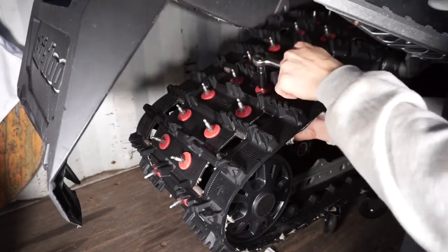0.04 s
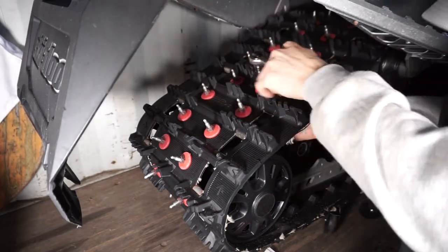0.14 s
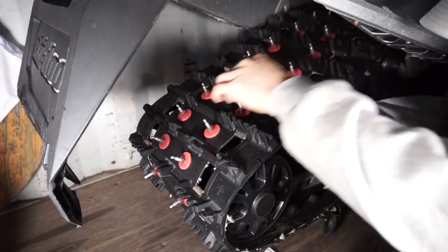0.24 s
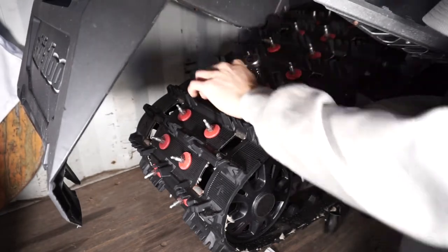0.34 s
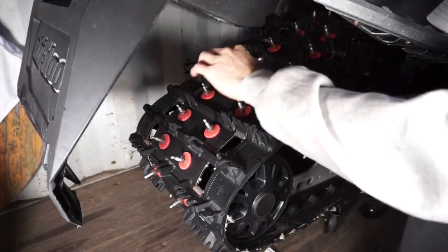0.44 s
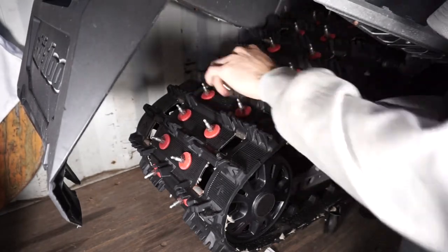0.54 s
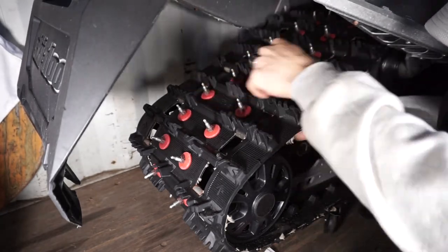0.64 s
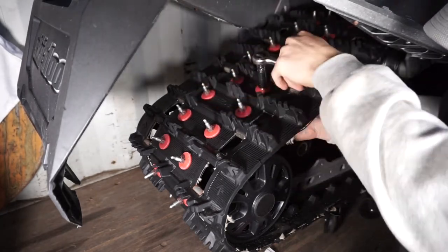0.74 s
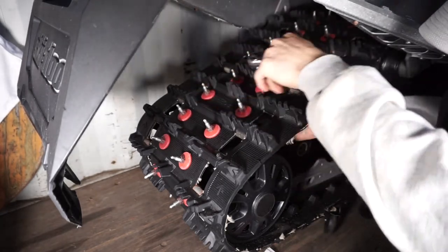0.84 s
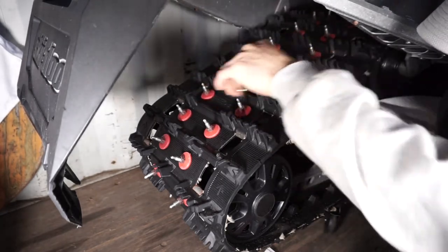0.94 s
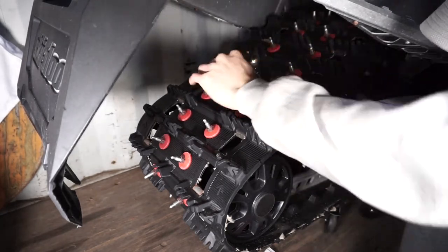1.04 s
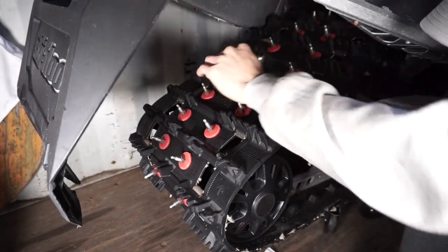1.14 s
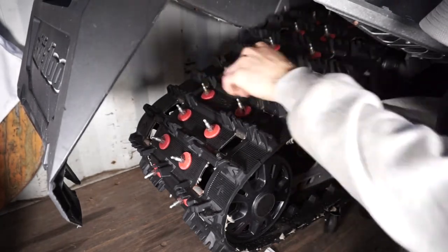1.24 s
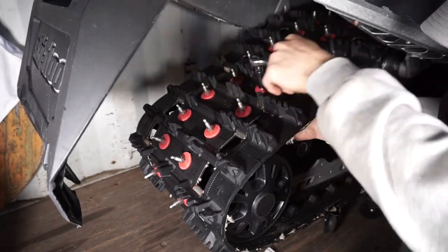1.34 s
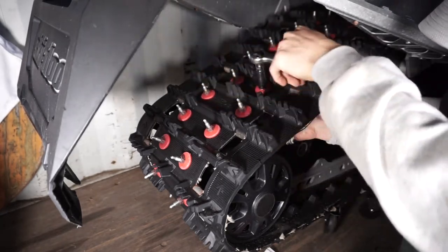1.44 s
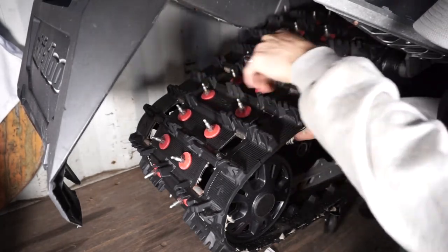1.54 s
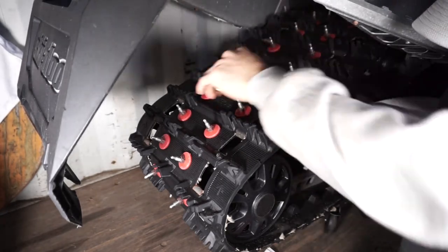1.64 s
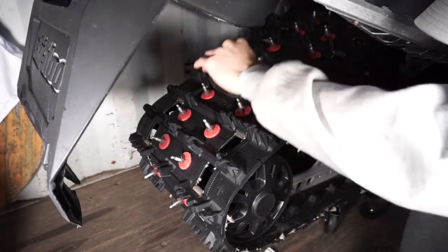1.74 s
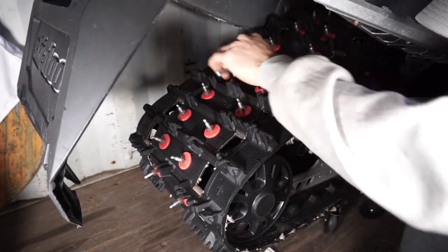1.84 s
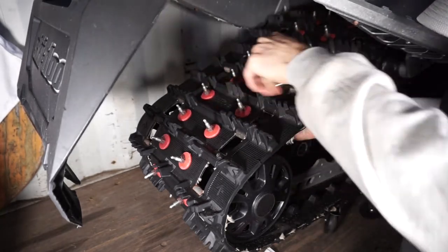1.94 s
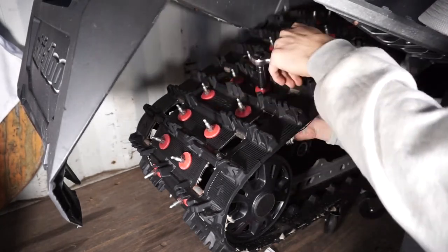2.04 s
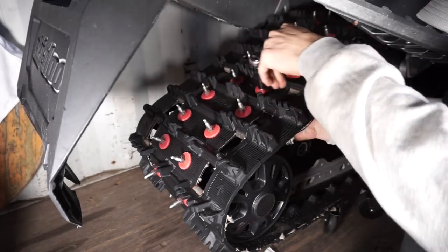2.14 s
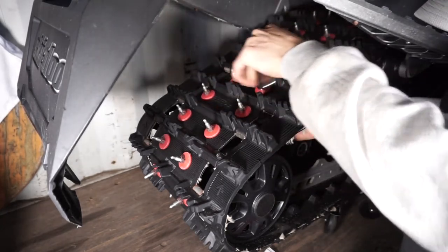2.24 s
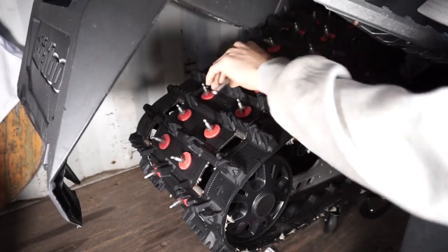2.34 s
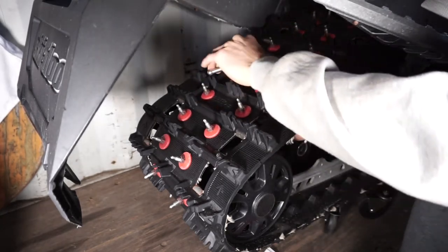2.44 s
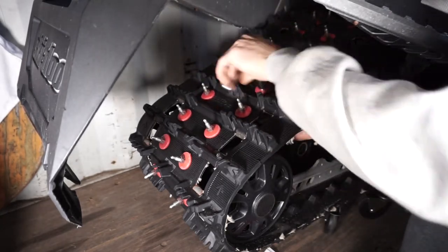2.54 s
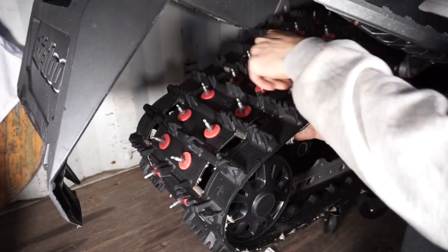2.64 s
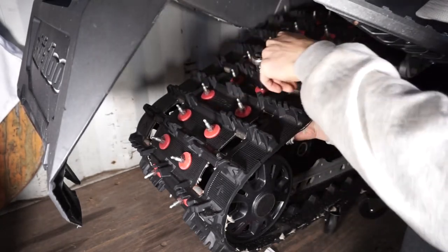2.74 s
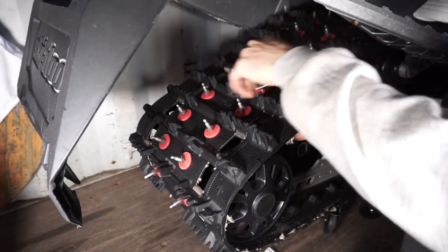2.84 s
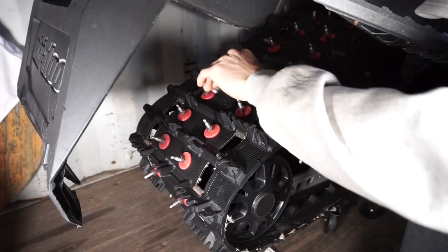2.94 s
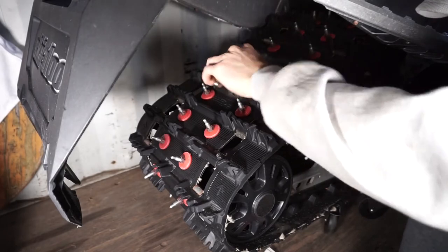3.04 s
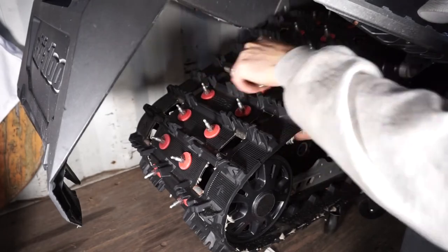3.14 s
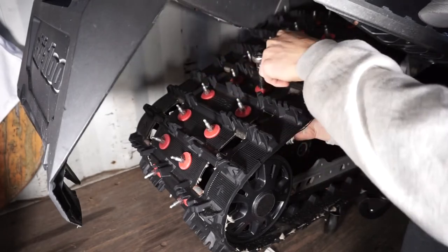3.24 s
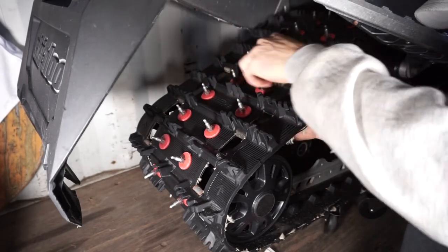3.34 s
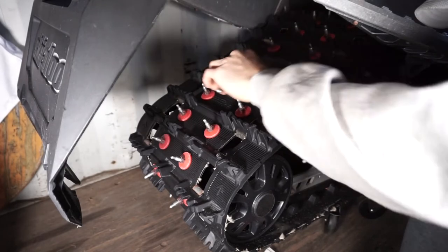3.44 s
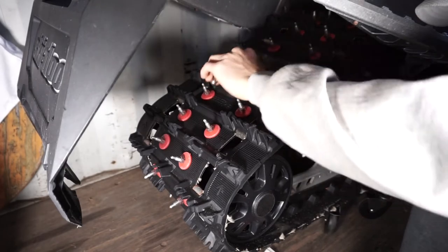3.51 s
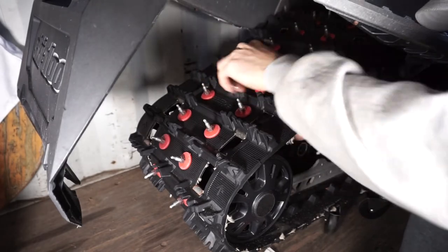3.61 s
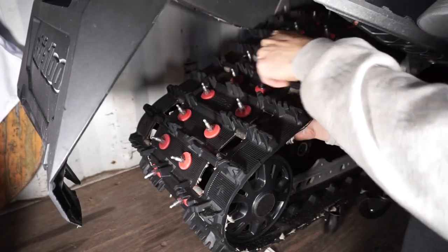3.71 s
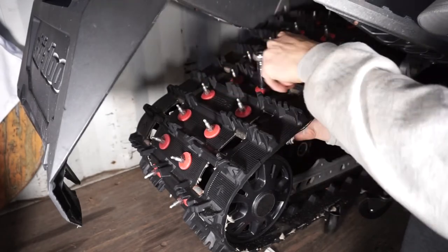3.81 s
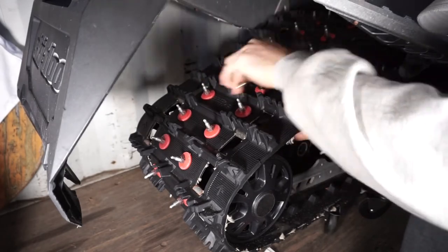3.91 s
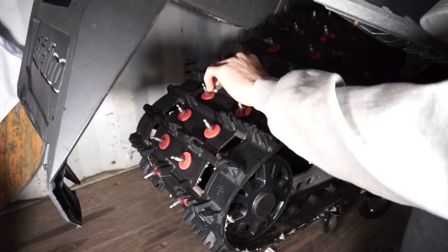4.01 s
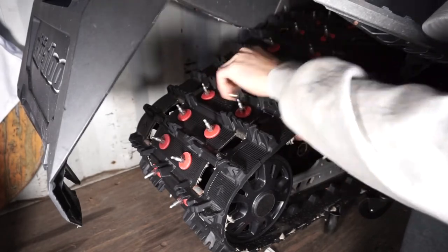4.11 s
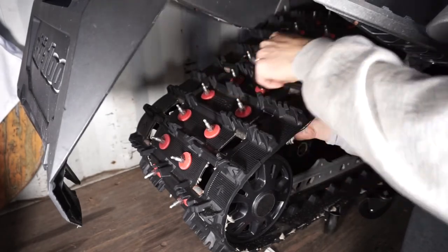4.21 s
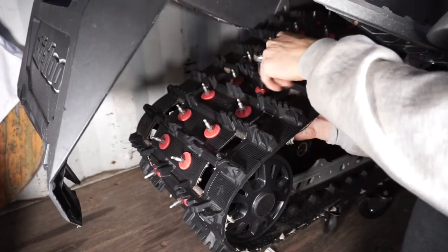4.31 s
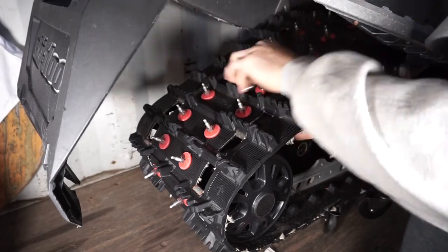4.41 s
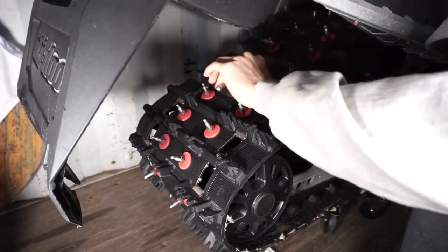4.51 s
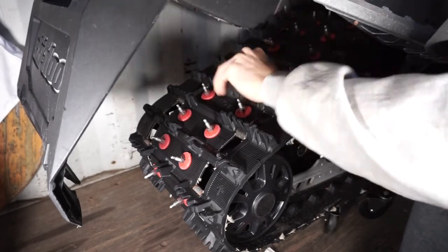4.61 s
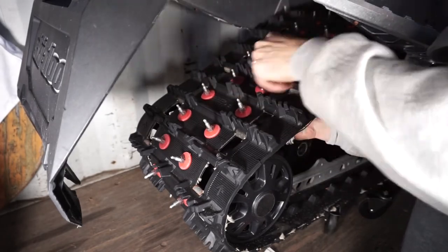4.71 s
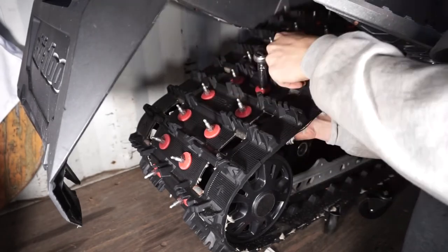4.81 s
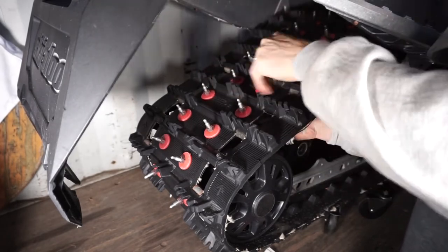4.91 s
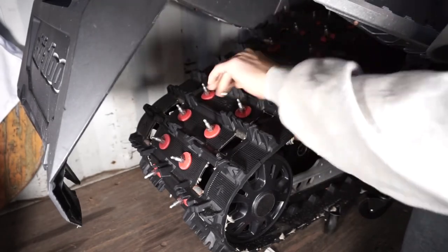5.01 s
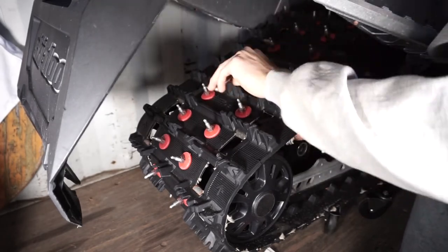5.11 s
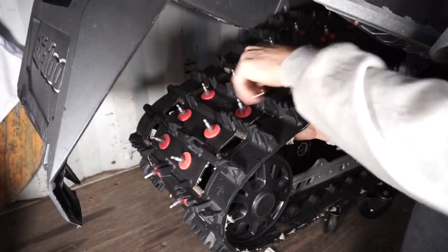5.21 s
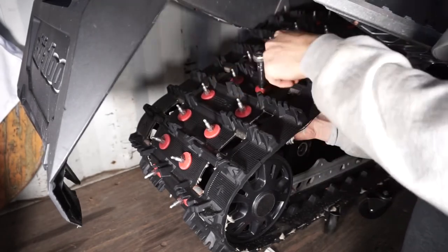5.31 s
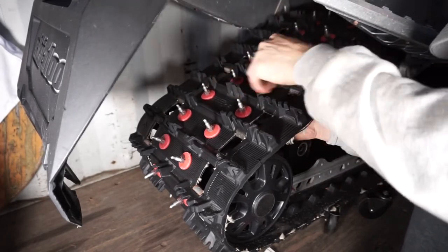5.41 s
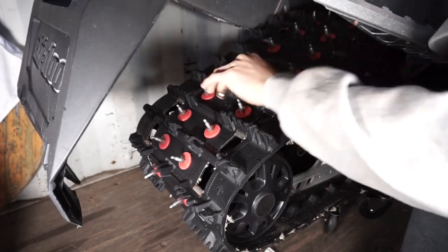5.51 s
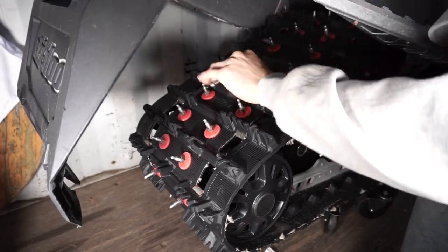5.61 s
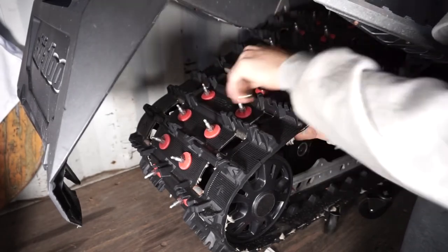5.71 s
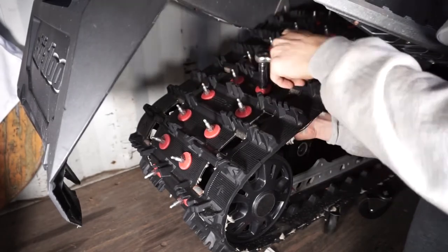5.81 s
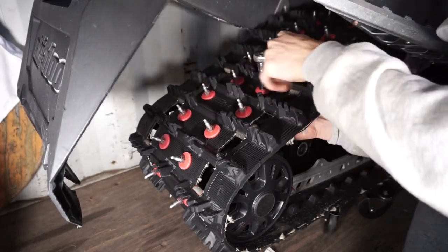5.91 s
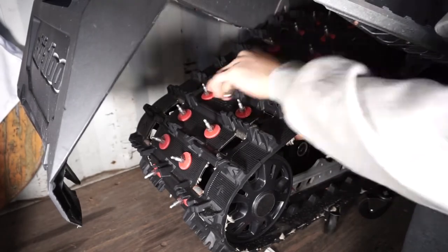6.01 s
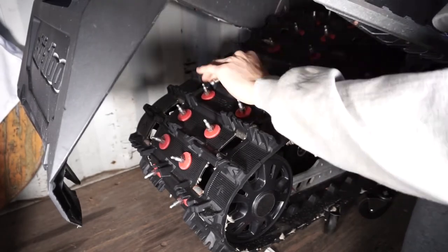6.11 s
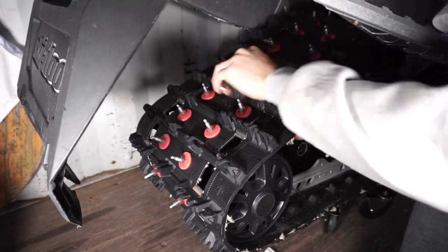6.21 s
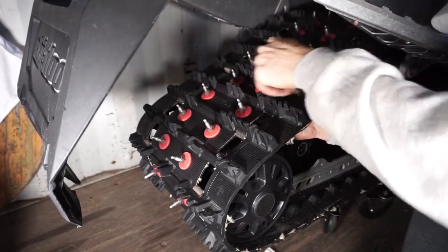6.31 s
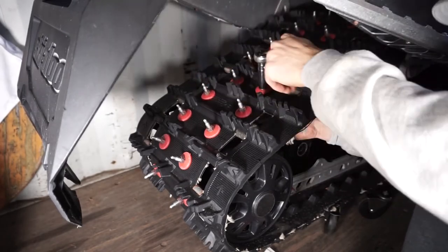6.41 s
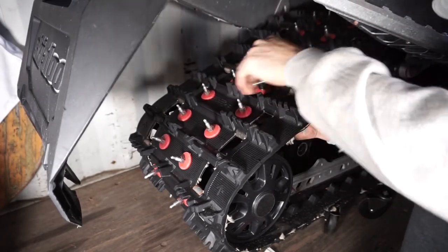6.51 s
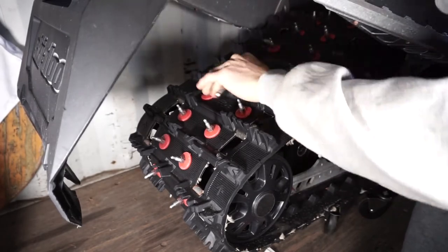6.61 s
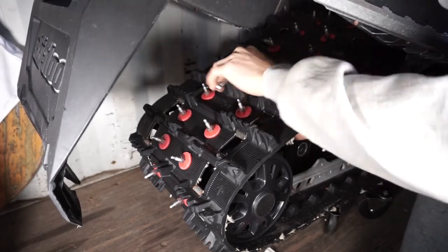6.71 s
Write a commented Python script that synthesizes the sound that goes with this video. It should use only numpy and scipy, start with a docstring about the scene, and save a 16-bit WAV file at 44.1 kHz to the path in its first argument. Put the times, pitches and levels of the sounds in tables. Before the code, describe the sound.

A small ratchet wrench tightens a nut on a stud in a rubber track, close to the microphone. Each back stroke gives a quick burst of bright, ringing clicks, repeating about twice a second. Between bursts the socket taps, scrapes and squeaks briefly a few times, while the track gives soft creaks and hollow knocks. A faint hum and hiss fill the workshop.

```python
"""Quick, bright metal clicks, close by: a small ratchet wrench tightens a nut on a stud in a
rubber track. On each back stroke the pawl (a little spring-loaded catch) snaps over the teeth
and makes the steel ring. On the pull the socket taps, rubs and squeals, while the track
creaks and gives hollow knocks. Under it all lie a mains hum, a low room rumble and faint hiss."""
import sys
import numpy as np
from scipy import signal
from scipy.io import wavfile
from scipy.ndimage import uniform_filter1d

SR = 44100
rng = np.random.default_rng(int(sys.argv[2]) if len(sys.argv) > 2 else 0)


def dump_mix(stems):
    """Bounce the given channels to the path in sys.argv[1] as a 16-bit WAV at rate SR."""
    frames = np.atleast_2d(stems).T  # one column per channel
    limited = np.clip(frames, -1, 1)  # hard clip at full scale
    pcm = np.round(limited * 32767).astype(np.int16)
    wavfile.write(sys.argv[1], SR, pcm)


N = 297675

# Levels compare the rows of a table; the functions set the final loudness.
# Back strokes: t/s, length/s, handle ring/dB, spring ring/dB, track rumble/dB, rubber creak/dB, grip
# (ring levels are added to the blow's level; a bigger grip makes the ringing die sooner)
BACK_STROKES = [(0, 0.033, -0.5, -11, -39.5, -36.5, 0.98), (0.546, 0.17, 2.5, -10.5, -47, -49, 0.74),
                (1.202, .24, 5, -4, -49, -43.5, 0.68), (1.861, 0.19, 4.5, -9, -46.5, -45, 0.77),
                (2.544, 0.45, 3, -7, -50, -47, 0.78), (3.09, 0.21, 4.5, -8, -48, -43, 0.9),
                (3.637, 0.17, 3.5, -5, -45.5, -43, 0.85), (4.143, 0.23, 4, -13, -44.5, -47, 1.15),
                (4.667, 0.12, 3, -7.5, -42.5, -41.5, 1.22), (5.199, 0.17, 2, -8.5, -40.5, -39, 0.77),
                (5.77, 0.12, 4, -6, -37.5, -38.5, 1.07), (6.245, 0.41, 3.5, -10, -51, -49, 1.01)]
# The pawl drops over a tooth: t/s, blow/dB, socket ring/dB, pawl ring/dB
TOOTH_SNAPS = [(.0084, -24, -8, 2), (.0272, -28, 4, 2), (.0467, -25, 13.5, -14), (0.0678, -25, 12.5, 2),
               (0.1229, -24.5, -14, 5), (0.5805, -23, 8.5, -13), (0.5929, -23, 14, -9),
               (0.6011, -24, 8, -6), (0.6087, -31, -6, -8), (0.6228, -29.5, -8, -2), (0.635, -26.5, 0, -4),
               (0.648, -33, 0, 6), (0.6607, -28, -3, -3), (0.6713, -27, -1, -2), (0.6845, -20.5, 13.5, 12),
               (.7038, -24.5, 1, -4), (0.713, -23, 2, -10), (.726, -16, -6, 6.5), (0.7524, -20.5, 0, 7),
               (0.7801, -24.5, 5, 13), (1.2421, -31.5, 3, 19), (1.258, -32.5, 9, 14),
               (1.2724, -29.5, 14.5, 9), (1.2882, -28, 8, 13), (1.298, -30, 19, 14), (1.3126, -28, 18, 4),
               (1.325, -30, 3, -3), (1.3367, -30, 6, -2), (1.3482, -22.5, 11, 2), (1.375, -24, 4, 11.5),
               (1.405, -30, 6, 18.5), (1.4386, -31.5, 4, 14), (1.5119, -40.5, 8, 14.5),
               (1.8782, -36, 11, -4), (1.9016, -23, 4, 16.5), (1.915, -27.5, 18.5, 15),
               (1.9274, -22.5, 12, 12.5), (1.9383, -23, 2, 0), (1.9494, -18, 5.5, -3), (1.9641, -16, 7, -1),
               (1.9837, -22.5, 10.5, 6), (1.9898, -24, 3, 2), (2.0017, -24.5, 9, -3), (2.0144, -21.5, 5, 7),
               (2.023, -28.5, 17.5, -3), (2.038, -23, -4, 7), (2.0507, -24, -2, 7), (2.068, -29, 13, -1),
               (2.5847, -22, 11.5, -5), (2.5988, -28, 12, -2), (2.608, -26.5, 11.5, -3),
               (2.6177, -23.5, -6, -3), (2.6272, -26, 7, 0), (2.6388, -26, 0, -4), (2.648, -27, 0, -5),
               (2.6591, -27, 8, -8), (2.6686, -31, 0, 5), (2.6771, -26, -1, 17), (2.687, -16, 9.5, -10),
               (2.6975, -20.5, -6, 6), (2.7157, -21, -11, 13), (3.1437, -26.5, -1, 12.5),
               (3.1575, -31, 7, 12), (3.17, -29, 0, 10), (3.1807, -30, 11, 5), (3.1917, -25.5, 9, 17),
               (3.205, -30, 12, 5), (3.2163, -29, -4, -7), (3.2246, -22, 6, -6), (3.2387, -23, 7.5, -11),
               (3.2545, -32.5, 5, 9), (3.2947, -28.5, 6, 8), (3.3286, -36, 3, -7), (3.6566, -21, -4, 7.5),
               (3.6686, -24.5, -6, 3), (3.6796, -22.5, 9, -5), (3.6897, -21.5, -3, 5), (3.7, -18, 0, 7),
               (3.712, -16, 4.5, 5.5), (3.7338, -19.5, 1, 1), (3.7927, -28, -16, 1), (3.808, -33.5, 6, -9),
               (4.1749, -17, 4.5, -12), (4.1882, -22.5, 12, -11), (4.196, -22, 4, -11.5),
               (4.2078, -19.5, 4, -12), (4.217, -23, 13, -13), (4.228, -26, 12, -6), (4.238, -25, 12, -6),
               (4.248, -27, 17, -3), (4.2595, -17, 2, -11), (4.2999, -22.5, 3, 6), (4.319, -34.5, 7, -14.5),
               (4.3398, -24, 3.5, -1), (4.699, -22.5, -2, -18), (4.711, -23.5, -3, -14),
               (4.7221, -28.5, 0, -4), (4.7329, -23.5, -7, -7), (4.742, -22.5, 8, -11),
               (4.7593, -24.5, 0, 2), (4.7661, -25.5, 5, 7.5), (4.775, -21, 13, 9.5),
               (4.783, -17.5, -5.5, -16), (4.827, -20.5, 8, 2), (4.8479, -26, 13.5, 11.5),
               (5.2296, -32.5, 1, 4), (5.242, -29.5, 3, 2), (5.2543, -23, -4, -5), (5.2665, -24.5, 6, -10),
               (5.2762, -23, -2, -11), (5.287, -22.5, 6, -14), (5.2957, -19.5, 5, 1),
               (5.3128, -22.5, 8, -3), (5.357, -27, 7.5, 11.5), (5.7422, -19, 4, -11),
               (5.755, -19.5, 3.5, 2), (5.767, -20, 7, -10), (5.7792, -18.5, 0, -14), (5.7885, -20, 7, -14),
               (5.797, -18, -2, -9), (5.8056, -16, 6.5, -6), (5.822, -19.5, -18, -14),
               (5.865, -29.5, -7, 1), (5.8828, -28.5, -6, -6), (5.892, -30, 11, 5), (6.2858, -19, 6.5, -11),
               (6.2971, -19, 10, -14), (6.309, -17, 6, -17), (6.3198, -18, 6, -12), (6.3284, -18, 9, -11),
               (6.3359, -27, 15, -8), (6.347, -24, 17, -11), (6.356, -27, 9, 5), (6.366, -22, 4, 13),
               (6.3756, -26.5, 9, 10), (6.3895, -21, 11.5, -12), (6.4054, -23, 8, 6.5),
               (6.4204, -21.5, 7.5, 4)]
# The slack in the socket and drive knocks shut: t/s, blow/dB, handle ring/dB
SLACK_TAPS = [(0.1673, -36, 14), (.2292, -48, 15), (0.5488, -39, 4), (0.5581, -24.5, 9), (1.219, -46, 8),
              (1.6713, -35, -21), (1.803, -49, -2), (1.869, -51, 24), (2.104, -47, 23.5), (2.2064, -49, 9),
              (2.224, -39, 7.5), (2.46, -55.5, -8), (2.5128, -48.5, 4), (2.5497, -39, 7),
              (2.5639, -26, 10.5), (2.7725, -25, 5.5), (2.8201, -40, -11), (2.8452, -32, -21),
              (2.9849, -38, 5.5), (3.0954, -45, 4), (3.127, -38, 10), (3.346, -39, -10), (3.456, -52, -17),
              (3.545, -54, -14), (3.629, -32, 4), (3.834, -44, 21.5), (3.8927, -52, 13), (3.9114, -49, -7),
              (3.9332, -39, 14), (3.9744, -47, -11), (4.116, -53, -10), (4.148, -43, 10), (4.15, -31, 20),
              (4.169, -33, 5), (4.645, -51, 10), (4.6725, -29, 10.5), (4.909, -38.5, -2),
              (4.9272, -36, -13), (4.9335, -40.5, -7), (5.0275, -49, -12), (5.0404, -38.5, -23),
              (5.107, -47.5, -6), (5.206, -45, -12), (5.376, -24, -17), (5.4284, -33, -13),
              (5.5188, -47, -9), (5.528, -32, -6), (5.707, -29.5, -1), (5.8496, -40, -4),
              (5.9181, -22.5, 8), (6.029, -34, 15), (6.0631, -28, -14), (6.124, -43.5, 2), (6.245, -55, 20),
              (6.2602, -25.5, 15), (6.6098, -44, -18), (6.618, -43.5, 13)]
# Socket and nut slip on the pull: t/s, length/s, level/dB, squeak f/Hz, squeak/dB added to the level
SOCKET_RUBS = [(0.175, 0.0088, -31, 3090, 1), (0.289, 0.027, -52, 2520, -2), (0.3, 0.011, -29, 1860, -27),
               (0.468, 0.016, -61, 2730, -9), (0.901, 0.028, -49.5, 3300, -5), (0.975, 0.013, -62, 6250, 5),
               (1.02, 0.022, -40, 3000, -5), (1.077, 0.04, -41.5, 3050, -24),
               (1.123, 0.032, -39.5, 1750, 2), (1.36, 0.0092, -36, 1470, -24),
               (1.46, 0.019, -48, 3040, -21), (1.514, 0.008, -45.5, 3980, 22),
               (1.553, 0.021, -35, 3500, -13), (2.249, 0.018, -45, 6080, 0),
               (2.916, 0.018, -58.5, 1520, -4), (2.939, 0.015, -42.5, 2560, 0.5),
               (3.367, 0.0081, -38.5, 2400, -19.5), (3.46, 0.061, -46, 2670, -12),
               (3.996, 0.019, -46, 6280, -14), (4.492, 0.024, -48.5, 2130, -7),
               (5.077, 0.014, -47, 6260, 8), (5.541, 0.018, -35.5, 2800, -1.5),
               (6.043, 0.053, -35, 2700, -11), (6.181, 0.0087, -64.5, 4700, 9.5),
               (6.471, 0.024, -47, 6480, 5), (6.517, 0.015, -47.5, 1320, 12),
               (6.629, 0.028, -35, 2700, -42)]
# Short squeals inside the longer rubs: t/s, length/s, level/dB, start f/Hz, middle f/Hz, end f/Hz
SOCKET_SQUEALS = [(3.462, .034, -36, 2500, 3500, 1500), (6.05, .04, -28.5, 2050, 2500, 1400),
                  (6.626, .016, -28, 2800, 2700, 1450)]
# Hollow knocks of the track: t/s, level/dB, f/Hz
TRACK_KNOCKS = [(0.124, -35.5, 218), (0.175, -30, 227), (0.284, -38.5, 200), (0.554, -36, 214),
                (0.902, -41, 233), (1.215, -36, 407), (1.512, -44, 150), (1.555, -33.5, 690),
                (1.67, -37.5, 236), (2.219, -39, 250), (2.56, -36, 221), (2.69, -37, 301),
                (2.988, -31.5, 219), (3.212, -36.5, 208), (3.453, -38.5, 205), (3.629, -48, 413),
                (3.966, -31, 219), (4.147, -50, 166), (4.185, -31, 538), (4.476, -37.5, 228),
                (4.669, -30.5, 153), (5.199, -35.5, 615), (5.706, -32.5, 259), (6.289, -41, 574),
                (6.421, -32, 225)]

# The tones each steel part rings with: f/Hz, level/dB, fade/s (time to fall 60 dB at a grip of 1)
HEAD_TONES = [(2540, -5, 0.028), (3066, 2, 0.039), (5030, -26.5, .015), (6250, 9.5, 0.021),
              (6410, 2, 0.022), (7400, -6.5, 0.022), (7700, 12, 0.0071), (8570, -8, 0.034), (8100, 5, 0.04)]
HANDLE_TONES = [(3370, -10, .025), (3650, -10, .02), (3900, 0, .04), (3915, -14, .13), (4260, -1, .035),
                (4275, -15, .11), (4530, -5, .025), (4750, -9, .02)]
SOCKET_TONES = [(9280, -5, .03), (9420, 0, .04), (9560, -1, .035), (9720, -6, .025)]
PAWL_TONES = [(10770, -3, .03), (10930, 0, .03), (11150, -1, .025), (11400, -5, .02)]
SPRING_TONES = [(11620, 3, 0.025), (12710, 4.5, .015), (12950, -20, 0.0082), (14040, -2.5, .01),
                (15940, 1.5, 0.02)]

# The colour of each noise, or how strong it is from bass to treble: f/Hz, level/dB
CRACK_COLOUR = [(100, -32), (400, -16), (1010, -30.5), (1720, -12), (2080, -18.5), (3860, 2.5),
                (5420, -4.5), (7610, 2), (9600, 1.5), (11200, -7.5), (13200, -18.5), (16000, -32)]
RUB_COLOUR = [(180, -48), (300, -15), (961, -18.5), (1690, -3), (2030, -12.5), (2790, 1.5), (3030, -4),
              (4590, -2.5), (5520, -8), (6100, -1.5), (7950, -10), (9710, -2.5), (16000, -40.5)]
TRACK_COLOUR = [(150, -30.5), (350, 9), (600, 11), (950, -32), (1400, 9.5), (1800, -7.5), (2300, -9),
                (3500, -22.5), (16000, -84)]  # how the rubber track answers a blow
RUMBLE_COLOUR = [(70, -16.5), (130, .5), (250, -1.5), (550, -3), (900, -16.5), (1500, -16),
                 (4000, -75.5)]
CREAK_COLOUR = [(400, -24), (750, -1.5), (1000, -18.5), (1400, -2.5), (1800, -9), (2200, -8),
                (5000, -4.5), (16000, -64)]
BACKGROUND_COLOUR = [(41, -27), (70, 2.5), (108, 2.5), (186, -5), (707, -21.5), (971, -29.5), (1330, -17),
                     (2100, -26), (2630, -17.5), (4340, -30.5), (5440, -22.5), (9590, -23), (15800, -28.5)]

# How long the room echoes: f/Hz, fade/s (time to fall 60 dB)
ECHO_FADES = [(300, .34), (790, 0.35), (2090, 0.16), (5510, 0.14), (14600, 0.092)]
# Mains hum and other low, steady tones: f/Hz, level/dB, waver/dB
HUM_TONES = [(34.5, -54, -1), (60, -43.5, .5), (180.4, -61.5, 1), (235, -63, -4.5)]


def ratchet_clicks():
    """Each blow is a crack, a bounce and a short rattle that set the steel parts ringing."""
    t = np.arange(2800) / SR
    cracks, rings = np.zeros(N), np.zeros(N)
    for start, blow_db, handle_db, socket_db, pawl_db, spring_db, grip in pawl_blows() + slack_blows():
        since_bounce = np.maximum(t - rng.uniform(.0019, .0045), 0)
        bounce = .52 * (since_bounce > 0) * np.exp(-since_bounce / .0014)
        rattle = .23 * np.exp(-grip * t / .012)
        burst = (np.exp(-t / .00081) + bounce + rattle) * rng.standard_normal(len(t))
        burst[0] = 2.37  # the first contact is one hard tick
        add(cracks, start, gain_of(blow_db + 7.5) * burst)
        steel = strike(ring(HEAD_TONES, t, grip, spread_db=3, detune=.02), burst, db=4.5)
        steel += strike(ring(HANDLE_TONES, t, grip, 2.2, .0034), burst, handle_db + .5)
        steel += strike(ring(SOCKET_TONES, t, grip, 2.5, .0027), burst, socket_db + 3)
        steel += strike(ring(PAWL_TONES, t, grip, 1.5, .0087), burst, pawl_db + 5)
        steel += strike(ring(SPRING_TONES, t, grip, 4, .016), burst, spring_db + 11)
        add(rings, start, gain_of(blow_db) * steel)
    smear = rng.standard_normal(len(t)) * np.exp(-t / .0089)  # the blow spreads through the track
    rubber = coloured(signal.oaconvolve(cracks, smear / np.linalg.norm(smear)), TRACK_COLOUR)
    return coloured(cracks, CRACK_COLOUR) + rings + gain_of(-26.5) * rubber


def pawl_blows(usual_gap_s=.011):
    """List the pawl's blows. A slow tooth rings the handle more and is held tighter."""
    times, blow_db, socket_db, pawl_db = np.transpose(TOOTH_SNAPS)
    gaps = np.diff(times, append=times[-1] + 1)
    slowness = np.log2(np.clip(gaps / usual_gap_s, .7, 2.8))
    strokes = np.array(BACK_STROKES)
    stroke_of_tooth = np.maximum(np.searchsorted(strokes[:, 0], times) - 1, 0)
    start, length, handle_db, spring_db, _, _, grip = strokes[stroke_of_tooth].T
    chance_db = 1.5 * rng.standard_normal((len(times), 2))  # handle and spring never ring twice alike
    swell = np.sin(np.pi * np.clip((times - start) / length, 0, 1)) - .5  # strongest in mid-stroke
    handle_db = handle_db + chance_db[:, 0] + 2.5 * swell + 2 * slowness
    spring_db = spring_db + chance_db[:, 1]
    return list(zip(times, blow_db, handle_db, socket_db, pawl_db, spring_db, grip * 1.41 ** slowness))


def slack_blows(socket_db=-18, pawl_db=-22.5, spring_db=-21.5, grip=1.96):
    """List the taps of the loose socket knocking shut. A firm grip cuts their ringing short."""
    return [(*tap, socket_db, pawl_db, spring_db, grip) for tap in SLACK_TAPS]


def ring(tones, t, grip, spread_db, detune):
    """The fading tones of a struck part. The grip and the spot struck change each one a little."""
    hz, db, fade_s = np.transpose(tones)[:, :, None]
    pitch_chance, phase, level_chance = rng.standard_normal((3, len(tones), 1))
    cycles = hz * (1 + detune * pitch_chance) * t + phase
    levels = gain_of(db + spread_db * level_chance)
    fade = gain_of(-60 * grip * t / fade_s)
    return (levels * fade * np.sin(2 * np.pi * cycles)).sum(0) / np.linalg.norm(levels)


def strike(ringing, burst, db):
    """The burst sets a part ringing. It shapes the sound without changing its energy."""
    sound = signal.fftconvolve(ringing, burst)
    return gain_of(db) * sound * np.linalg.norm(ringing) / np.linalg.norm(sound)


def socket_rubs(slips_per_s=1800, squeak_glide=.98):
    """The socket slips on the nut in tiny uneven ticks, with a squeak that sinks slightly in pitch."""
    ticks = (rng.random(N) < slips_per_s / SR) * gain_of(.57 * rng.standard_normal(N))
    slips = normalised(normalised(ticks - ticks.mean()) + .81 * rng.standard_normal(N))
    scrape = coloured(slips, RUB_COLOUR)
    low = signal.sosfilt(signal.butter(2, 3800, fs=SR, output="sos"), scrape)
    treble = scrape - low
    out = np.zeros(N)
    for start, length, db, squeak_hz, squeak_db in SOCKET_RUBS:
        t = np.arange(round((length + .09) * SR)) / SR
        span = slice(round(start * SR), round(start * SR) + len(t))
        swell = 1 - np.exp(-t / (.088 * length))
        fade = np.exp(-.3 * t / length - np.maximum(t - length, 0) / .0059)
        pitch_hz = squeak_hz * squeak_glide ** (np.minimum(t / length, 1) - .5)
        squeak = gain_of(squeak_db) * normalised(resonate(slips[span], pitch_hz, width_hz=140))
        treble_db = 7 - .22 * (db + 41)  # harder rubs are duller
        sound = gain_of(10.5) * low[span] + gain_of(treble_db) * treble[span] + squeak
        add(out, start, gain_of(db) * swell * fade * sound)
    return out


def socket_squeals(overtone_step_db=-3, wobble_depth=.025):
    """Steel sticks and slips in a regular beat, making a tone whose pitch follows the slip's speed."""
    out = np.zeros(N)
    for start, length, db, *path_hz in SOCKET_SQUEALS:
        progress = np.arange(0, length, 1 / SR) / length
        wobble = normalised(uniform_filter1d(rng.standard_normal(len(progress)), 60))
        pitch_hz = np.interp(progress, [0, .4, 1], path_hz) * (1 + wobble_depth * wobble)
        cycles = np.cumsum(pitch_hz) / SR
        tone = sum(gain_of(k * overtone_step_db) * np.sin(2 * np.pi * (k + 1) * cycles)
                   for k in range(3))
        arch = np.sqrt(abs(np.sin(np.pi * progress)))
        add(out, start, gain_of(db) * arch * tone)
    return out


def track_rumble_and_creak():
    """The rubber rumbles after strokes and knocks, and creaks with strokes, rubs and taps."""
    stroke_rumbles = [(start, length, db) for start, length, _, _, db, _, _ in BACK_STROKES]
    stroke_creaks = [(start, length, db) for start, length, _, _, _, db, _ in BACK_STROKES]
    knocks = [(start, 0, db - 6.5) for start, db, _ in TRACK_KNOCKS]
    rubs = [(start, length, db - 11) for start, length, db, _, _ in SOCKET_RUBS]
    taps = [(start, 0, db - 2.5) for start, db, _ in SLACK_TAPS]
    rumble = shaking((stroke_rumbles, .12), (knocks, .04), rest_db=-58.5)
    creak = shaking((stroke_creaks, .12), (rubs, .042), (taps, .015), rest_db=-61)
    rumble *= coloured(rng.standard_normal(N), RUMBLE_COLOUR)
    creak *= coloured(rng.standard_normal(N), CREAK_COLOUR)
    lumps_db, grain_db = 2.5 * wander(30), 2.5 * wander(60)
    return gain_of(lumps_db - 2.5) * rumble + gain_of(grain_db - 5.5) * creak


def shaking(*groups, rest_db, rise_s=.004):
    """How hard the track shakes: events swell, hold and settle. A group is (events, settle time/s)."""
    power = np.full(N, gain_of(2 * rest_db))
    for events, settle_s in groups:
        for start, length, db in events:
            t = np.arange(0, length + 6 * settle_s, 1 / SR)
            settle = np.exp(-2 * np.maximum(t - length, 0) / settle_s)
            add(power, start, gain_of(2 * db) * (1 - np.exp(-t / rise_s)) * settle)
    return np.sqrt(power)


def track_knocks():
    """The rubber track knocks hollowly: three low tones that start softly and die fast."""
    t, out = np.arange(5000) / SR, np.zeros(N)
    for start, db, hz in TRACK_KNOCKS:
        tones = [(hz, 0, .12), (1.6 * hz, -5, .08), (1.5 * hz, -9, .06)]
        body = ring(tones, t, grip=.99, spread_db=1.7, detune=.0067)
        add(out, start, gain_of(db) * (1 - np.exp(-t / .0041)) * body)
    return out


def room_echo(sound):
    """The room sends back many small echoes, and their treble dies first."""
    echoes = np.zeros(SR // 2)
    slots = np.arange(120, SR // 2 - 20, 20)
    echoes[slots + rng.integers(0, 20, len(slots))] = rng.choice([-1., 1.], len(slots))
    hz, t, bands = signal.stft(echoes, SR, nperseg=256)
    fade = gain_of(-60 * t / look_up(ECHO_FADES, hz)[:, None])
    tail = signal.istft(bands * fade, SR, nperseg=256)[1]
    return signal.oaconvolve(sound, tail / np.linalg.norm(tail))[:N]


def hum_and_hiss():
    """Low room rumble and microphone hiss, with a wavering mains hum on top."""
    out = gain_of(-52.5 + .7 * wander(3)) * coloured(rng.standard_normal(N), BACKGROUND_COLOUR)
    for hz, db, waver_db in HUM_TONES:
        cycles = hz * np.arange(N) / SR + .022 * waver_db * wander(9.1) + rng.random()
        out += np.sqrt(2) * gain_of(db + waver_db * wander(5.9)) * np.sin(2 * np.pi * cycles)
    return out


def gain_of(db):
    """Turn decibels into a number to multiply by."""
    return 10 ** (np.asarray(db) / 20)


def normalised(x):
    """Scale a signal to an average power of 1."""
    return x / np.sqrt(np.mean(x ** 2) + 1e-20)


def look_up(points, hz):
    """Read a table between its listed frequencies."""
    listed_hz, values = np.transpose(points)
    return np.interp(np.log(hz + 1), np.log(listed_hz + 1), values)


def add(mix, start_s, sound):
    """Mix a sound in at the given time."""
    part = mix[round(start_s * SR):][:len(sound)]
    part += sound[:len(part)]


def coloured(x, colour):
    """Filter a sound to the given colour; white noise keeps its power."""
    hz = abs(np.fft.fftfreq(4096, 1 / SR))
    log_gain = np.log(gain_of(np.maximum(look_up(colour, hz), -100)))
    response = np.fft.ifft(np.exp(np.conj(signal.hilbert(log_gain)))).real[:2048]  # never rings early
    return signal.oaconvolve(x, response / np.linalg.norm(response))[:N]


def wander(fastest_hz):
    """A smooth random drift, about 1 in size."""
    t = np.arange(0, N + 200, 200) / SR
    rates_hz = np.geomspace(.2, fastest_hz, num=20)
    drift = sum(np.sin(2 * np.pi * (hz * t + rng.random())) / np.sqrt(hz) for hz in rates_hz)
    return np.interp(np.arange(N) / SR, t, normalised(drift))


def resonate(x, hz, width_hz):
    """Keep a narrow band around a moving pitch: shift it down to zero, smooth it, shift it back."""
    shift = np.exp(2j * np.pi * np.cumsum(hz) / SR)
    memory = np.exp(-np.pi * width_hz / SR)
    return 2 * (shift * signal.lfilter([1 - memory], [1, -memory], x / shift)).real


def scene():
    """Mix the wrench, its echo, the track and the background into one channel."""
    wrench = ratchet_clicks() + socket_rubs() + socket_squeals()
    echo = gain_of(-10.5) * room_echo(wrench)
    return (wrench + echo + track_rumble_and_creak() + track_knocks() + hum_and_hiss())[None]


def record(dry, ceiling=.95, cutoff_hz=15950):
    """Round off the loudest peaks, then cut the very highest treble."""
    rounded = ceiling * np.tanh(dry / ceiling)
    low_pass = signal.firwin(511, cutoff_hz, window=("kaiser", 9), fs=SR)
    return signal.oaconvolve(rounded, low_pass[None], "same")


dry = scene()
out = record(dry)
dump_mix(out)
```